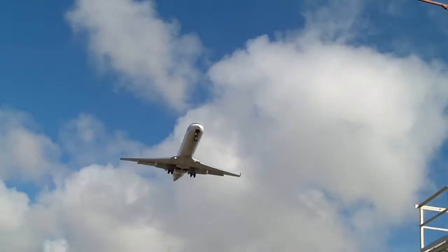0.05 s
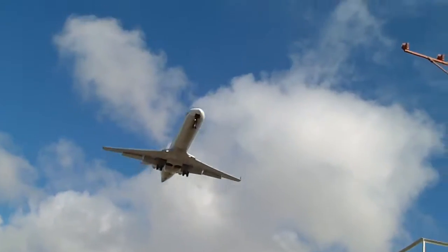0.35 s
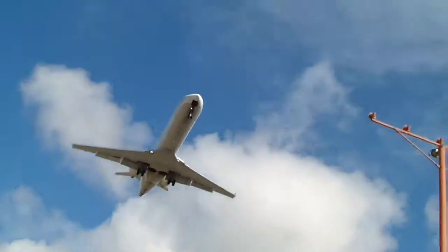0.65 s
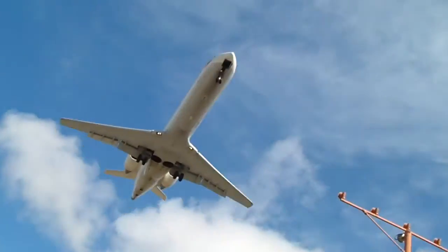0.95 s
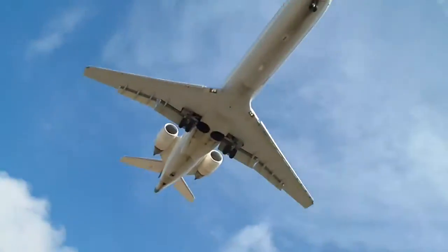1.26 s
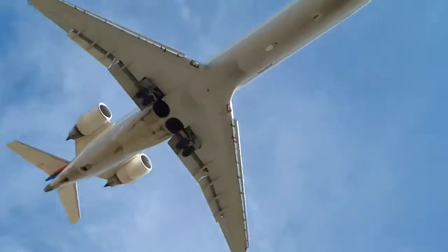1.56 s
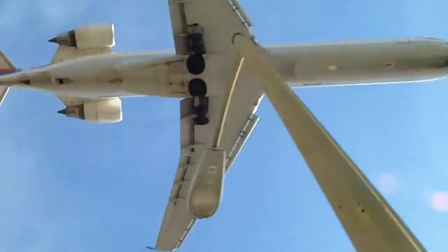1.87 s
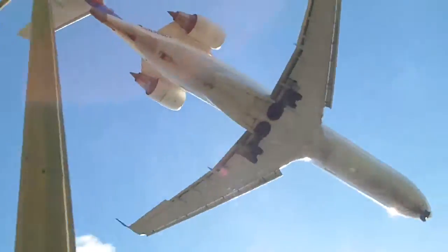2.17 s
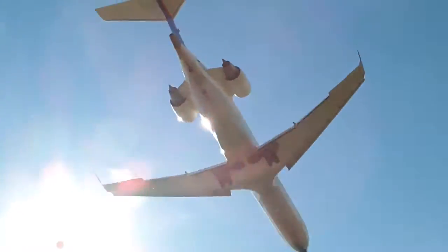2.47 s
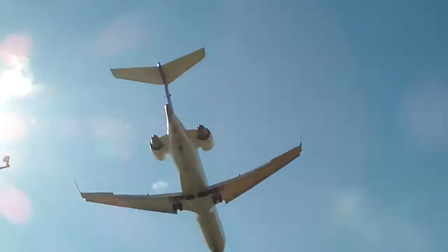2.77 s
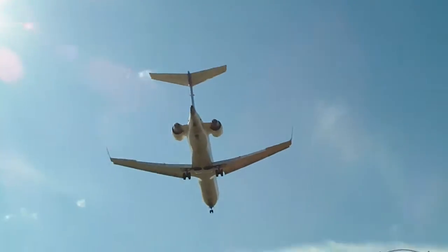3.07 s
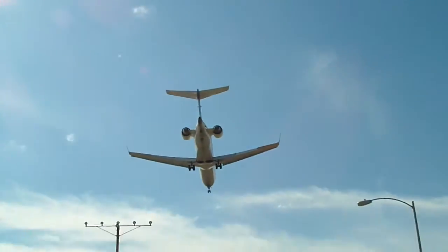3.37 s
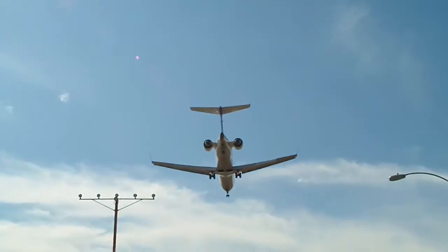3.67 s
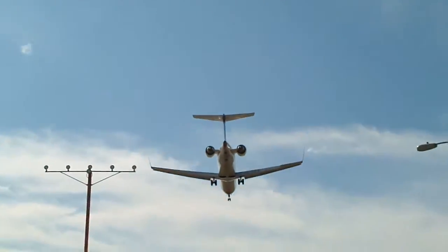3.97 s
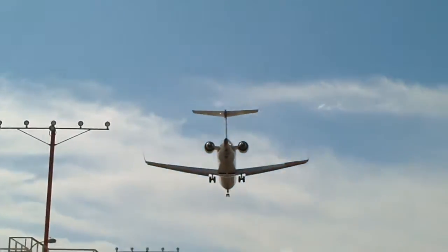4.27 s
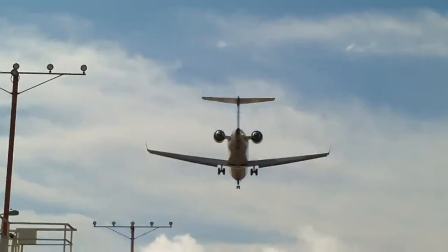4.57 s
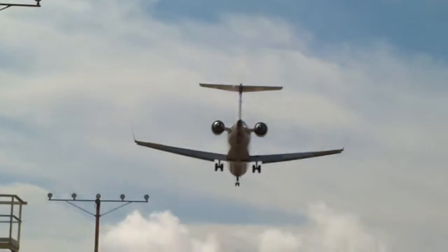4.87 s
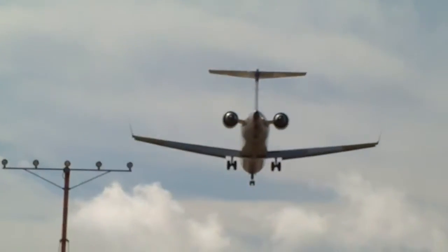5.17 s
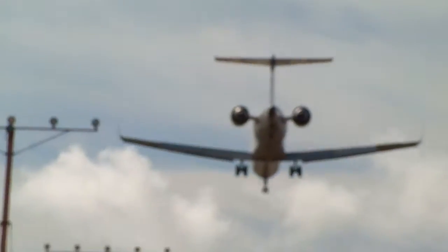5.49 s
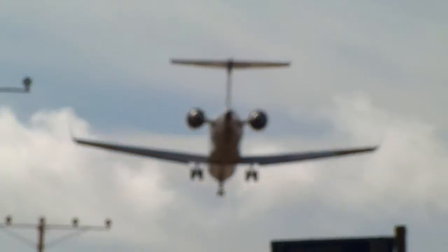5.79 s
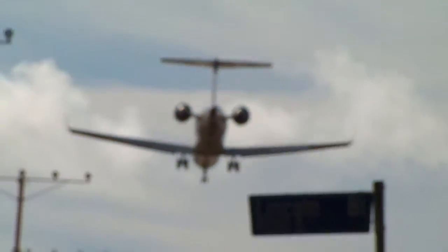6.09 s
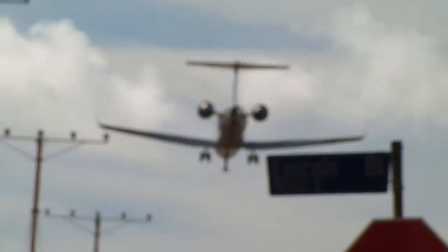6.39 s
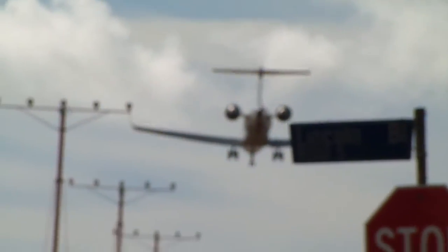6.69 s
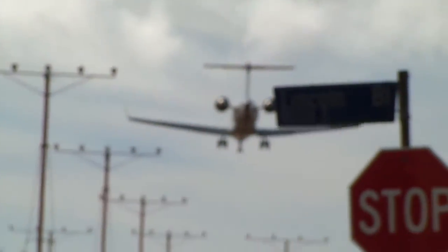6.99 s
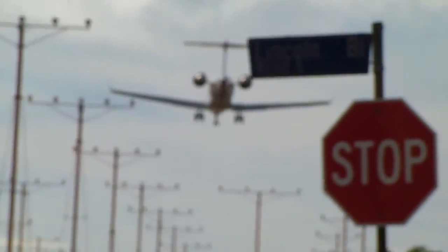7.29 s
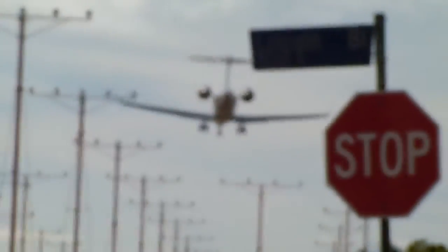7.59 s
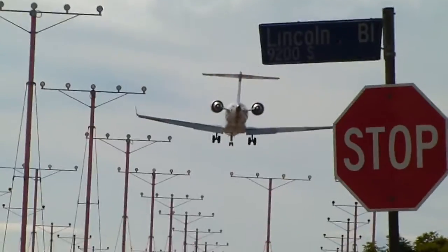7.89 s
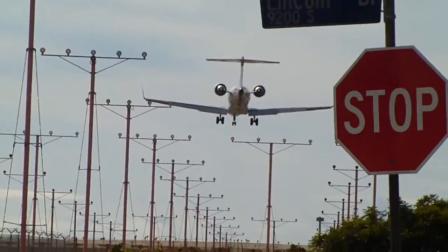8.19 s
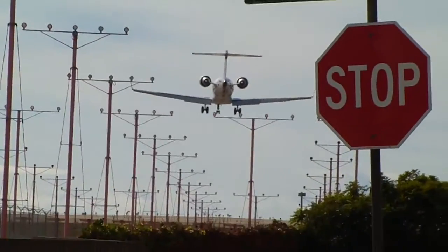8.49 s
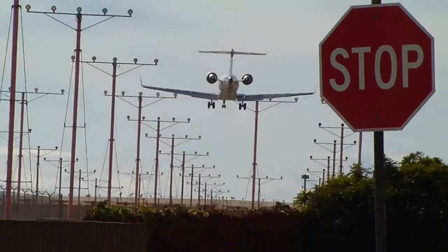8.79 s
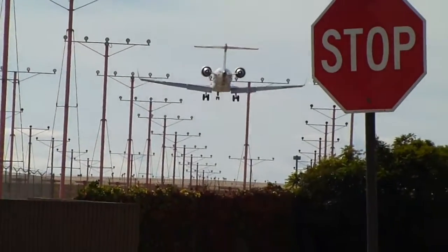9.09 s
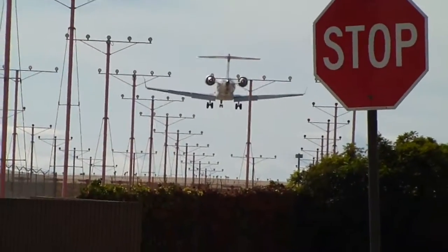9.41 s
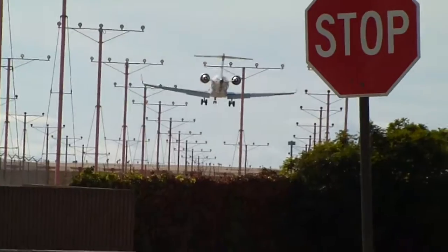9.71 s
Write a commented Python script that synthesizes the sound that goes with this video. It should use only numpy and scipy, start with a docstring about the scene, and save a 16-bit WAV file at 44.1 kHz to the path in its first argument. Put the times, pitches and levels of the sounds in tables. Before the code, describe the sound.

A small twin-engined jet is already approaching at the start, a high, wavering fan whine over a broad rushing roar with a faint hum beneath. From about 1 to 1.7 seconds its hiss surges and the whine begins to slide down. It passes low overhead at around 2 seconds, the roar taking on a hollow, phasing sweep. A thin, very high whistle stands out near 2.5 seconds, falling in pitch and fading by about 6. From 3 seconds on the jet recedes: the hiss drains away, the whine sinks lower and weakens, and a duller, fluttering roar lingers. The roar rolls back slightly between 7 and 8 seconds, with a deep rumble just after 8. A few tiny, faint ticks occur near the microphone from about 7.8 seconds. At 9.5 the distant roar swells once more. The sound is outdoors, in stereo, from under the approach path.

```python
"""Small twin jet landing, from under the approach path

The jet passes about 45 m above the microphone at 2 s and sinks away toward the runway. Exhaust,
airframe and fans make a broad roar, coloured by distance and direction; fan and turbine tones fall
in pitch. The ground echo sweeps a comb through the roar and uneven air makes it flutter.
A camcorder's stereo microphone colours it all."""
import sys
import numpy as np
from scipy import signal
from scipy.fft import rfft, irfft, next_fast_len
from scipy.io import wavfile
from scipy.ndimage import uniform_filter1d, map_coordinates

SR = 44100
rng = np.random.default_rng(int(sys.argv[2]) if len(sys.argv) > 2 else 0)


def waveform_to_disk(signal):
    """Save audio, clipped to [-1, 1], as 16-bit WAV at the path in sys.argv[1]."""
    frames = np.transpose(np.atleast_2d(signal))
    scaled = np.clip(frames, -1, 1) * 32767
    samples = np.round(scaled).astype(np.int16)
    wavfile.write(sys.argv[1], SR, samples)


N = 434365
TIME = np.arange(N) / SR
OVERHEAD_S = 1.98  # the jet is heard from straight above

# spectra of the jet's middle, high and highest flow noise: f/Hz, level/dB
ROAR_SPECTRUM = [(330, -69), (470, -7), (570, -1.5), (780, 1), (1000, 2.5), (1200, 1), (1500, -4),
                 (2200, -41)]
HISS_SPECTRUM = [(1800, -8), (2400, 1.5), (2850, 0.5), (3300, 3.5), (4000, 6), (4800, 3.5), (5400, -8),
                 (6300, -37.5), (9000, -65)]
SIZZLE_SPECTRUM = [(5000, -27), (6800, -3), (8100, 0.5), (9400, -7.5), (10600, -14.5), (11500, -32.5),
                   (13500, -48)]


def flight(height_m=44.5, speed_m_s=68, sound_m_s=343):
    """Where the sound now heard left the jet: distance in heights, degrees off nose, Doppler factor."""
    mach, descent_s = speed_m_s / sound_m_s, height_m / sound_m_s
    heard_s = TIME - OVERHEAD_S + descent_s
    root_s = np.sqrt((mach * heard_s) ** 2 + (1 - mach ** 2) * descent_s ** 2)
    sent_s = (heard_s - root_s) / (1 - mach ** 2)  # on a straight, level path
    angle = np.arctan2(height_m, -speed_m_s * sent_s)
    return 1 / np.sin(angle), np.degrees(angle), 1 / (1 - mach * np.cos(angle))


def passing(path, lobes, db, doubling_db, fading=1):
    """Level in dB at the microphone: a step per doubling of distance, lobes, a share of slow fading."""
    # slow swells and fades: t/s, gain/dB
    fades = [(0, 1), (.1, -1), (.28, 1), (.95, -1.5), (1.15, 0.6), (1.5, 1.5), (1.82, -0.5), (2.25, 0.6),
             (3.1, 2.5), (3.85, 2), (4.3, 3.5), (5.25, 1.1), (5.6, -0.5), (6.8, -1), (7.35, -0.4),
             (8.2, -0.3), (9.2, -4), (9.85, 0)]
    distance, angle, _ = path
    return db + doubling_db * np.log2(distance) + bumps(angle, lobes) + fading * curves(fades)[0]


def flow_levels(path):
    """Levels in dB of the six flow noises; with distance the treble sinks and the bass takes over."""
    # lobes of each noise, 0 deg ahead of the nose, 180 behind: angle/deg, half width/deg, gain/dB
    boom_lobes = [(26, 7, 4), (49.6, 10, 2), (105, 30, -5), (156.5, 17.5, -5.5), (164, 2.2, -2.5),
                  (171.2, 0.98, 3.5)]
    rumble_lobes = [(25.5, 12, 7.5), (97.6, 34, 11), (157.3, 11.5, -6), (167.4, 1.7, 2.5), (173, 1.3, -0.5),
                    (173.8, 1.1, 1.5)]
    roar_lobes = [(24.5, 6.7, 4.5), (100.4, 37.4, 6.5), (154.2, 30, -8)]
    rush_lobes = [(25.5, 13.8, 6.5), (115, 14, 2), (155, 11, -3)]
    hiss_lobes = [(16.1, 3.1, 2.8), (29.5, 26, 7), (123, 20, 2.2)]
    sizzle_lobes = [(13.4, 2.7, 11), (38.6, 33.5, 10), (125.3, 32, 9.7)]
    # far off, the roar rolls back twice and the hiss gusts: t/s, half length/s, rise/dB
    rolls = [(7.3, 0.29, 2.5), (7.98, 0.38, 1.5)]
    gusts = [(7.33, .15, 3.5), (8.803, 0.034, 2)]
    return (passing(path, boom_lobes, db=-54, doubling_db=2, fading=.2),
            passing(path, rumble_lobes, db=-43, doubling_db=1.48, fading=.17),
            passing(path, roar_lobes, db=-29, doubling_db=2) + bumps(TIME, rolls),
            passing(path, rush_lobes, db=-22.5, doubling_db=-1.73) + .22 * bumps(TIME, rolls),
            passing(path, hiss_lobes, db=-22.5, doubling_db=-4.5) + bumps(TIME, gusts),
            passing(path, sizzle_lobes, db=-36.5, doubling_db=-8.5))


def flow_noise(levels):
    """Exhaust, airframe and fan noise; uneven air shakes the upper bands together, the treble most."""
    # spectra of the exhaust's deep boom, the rumble and the upper-middle rush: f/Hz, level/dB
    boom_spectrum = [(20, -47), (45, -32), (85, -10.5), (125, -5), (170, -1), (240, 1.5), (400, -31)]
    rumble_spectrum = [(100, -23.5), (170, -11), (240, -3), (350, 2), (470, 4.5), (600, 1.5), (950, -44)]
    rush_spectrum = [(700, -29), (1050, -10), (1350, 2), (1700, 4), (2100, 2.5), (2500, -1.5), (2900, -2),
                     (4000, -8.5), (6000, -94)]
    # surges of intake hiss just before the jet is overhead: t/s, half length/s, rise/dB
    surges = [(1.157, 0.022, 9), (1.263, 0.034, 6.5), (1.425, 0.021, 4), (1.505, 0.02, 2),
              (1.623, .02, 2.5)]
    boom_db, rumble_db, roar_db, rush_db, hiss_db, sizzle_db = levels
    flutter = walk(24)
    surge_db = bumps(TIME, surges)
    surge_db = surge_db - uniform_filter1d(surge_db, SR // 4)  # lulls lie between the surges
    boom = stream(boom_spectrum, boom_db + .85 * walk(5.2))
    rumble = stream(rumble_spectrum, rumble_db - .5 + .5 * walk(4.2))
    roar = stream(ROAR_SPECTRUM, roar_db - .5 + .1 * flutter + .25 * walk(12))
    rush = stream(rush_spectrum, rush_db - .8 + .31 * flutter + .1 * walk(12))
    hiss = stream(HISS_SPECTRUM, hiss_db + 1.68 + .35 * flutter + .17 * surge_db + .5 * walk(36))
    sizzle = stream(SIZZLE_SPECTRUM, sizzle_db - .6 + .5 * flutter + surge_db + walk(50))
    return boom + rumble + roar + rush + hiss + sizzle


def fans(path, detune=.006, wander=.00297, second_fan_db=-7, flutter_db=2.4):
    """Two fans, not quite in step: three harmonics of the blade tone, in skirts of scattered sound."""
    # blade-passing tone, falling with Doppler shift and throttle: t/s, f/Hz
    blade_pitch = [(0, 2657), (.48, 2665), (.72, 2598), (.9, 2520), (1.1, 2440), (1.35, 2372), (1.52, 2328),
                   (1.68, 2300), (2.15, 2172), (2.35, 2092), (2.65, 2002), (3.1, 1945), (3.5, 1830),
                   (4, 1738), (5, 1715), (6.5, 1520), (9.85, 1470)]
    # lobes of the blade tone and of its octave: angle/deg, half width/deg, gain/dB
    blade_lobes = [(22, 9, 7), (34, 3.5, -5), (50, 12, 8.5), (80, 11, -10.5), (108, 26, 6.3),
                   (158, 1.7, -6), (163, 4, -1.5), (168.4, 1.3, -7)]
    octave_lobes = [(19, 9, 4.5), (33, 4.5, 13), (41, 6, 11.5), (57, 14, 11), (125, 15, 4)]
    # brief flares of the blade tone: t/s, half length/s, rise/dB
    flares = [(0.02, .03, 7), (1.52, 0.04, 5), (1.66, .03, 6), (2.07, .06, 4.5), (2.615, 0.06, 8),
              (3.52, .07, 3), (4.093, 0.07, 6)]
    hz, = curves(blade_pitch)
    _, angle, _ = path
    # heard from behind, through the wake, the skirt takes over and the flutter grows
    wake = np.clip((angle - 90) / 90, 0, 1) ** 4
    clean_db, skirt_db = 1.4 - 7 * wake, -6 + 7 * wake
    blade_db = passing(path, blade_lobes, db=-32, doubling_db=-2.5) + bumps(TIME, flares)
    octave_db = passing(path, octave_lobes, db=-38, doubling_db=-3.5)
    whine = 0
    for harmonic, db in enumerate((blade_db, octave_db, octave_db - 17), 1):
        tone = undb(skirt_db) * scattered(harmonic * hz, width_hz=85 * harmonic)
        for offset, fan_db in ((0, 0), (detune, second_fan_db)):
            pitch = harmonic * hz * (1 + offset + wander * walk(90))
            gain = undb(clean_db + fan_db + flutter_db * walk(60))
            tone = tone + gain * np.sin(phase_of(pitch))
        whine = whine + undb(db + flutter_db * np.sqrt(wake) * walk(30)) * tone
    return whine


def turbines(stage_ratio=.845):
    """Two turbine stages: a whistle in a haze scattered by the hot exhaust, and a weaker one below."""
    # whistle sent out behind the jet: t/s, f/Hz, level/dB
    glide = [(1.4, 9800, -90), (1.7, 9480, -52), (1.9, 9250, -47), (2.05, 8900, -38), (2.3, 8280, -33.5),
             (2.55, 7880, -34), (3, 7660, -39), (3.6, 7400, -48), (4.3, 7270, -51.5), (5.2, 7200, -56),
             (6.2, 7120, -68), (9.85, 7050, -80)]
    hz, db = curves(glide)
    upper = undb(-3) * (scattered(hz, width_hz=65) + scattered(hz, width_hz=240))
    lower = undb(-4) * scattered(stage_ratio * hz, width_hz=150)
    return undb(db) * (upper + lower)


def compressors():
    """Two faint intake whistles on one pitch, heard only while the jet comes toward the microphone."""
    # whistle sent out ahead of the jet: t/s, f/Hz, level/dB
    glide = [(.6, 10500, -80), (1.1, 10080, -54), (1.3, 9950, -51), (1.65, 9750, -56), (1.9, 9500, -100)]
    hz, db = curves(glide)
    return undb(db) * (scattered(hz, width_hz=80) + scattered(hz, width_hz=80))


def shafts(path, shaft_hz=373, drift_hz_per_s=3.8, wander=.00293):
    """Engine shaft hum: a wavering tone that drops as the jet goes over and blurs as it recedes."""
    # strength of the hum: t/s, level/dB
    hum_level = [(0, -43), (1.1, -40), (1.6, -50), (2.2, -46), (3, -51), (3.7, -62), (4.9, -57), (5.7, -47),
                 (6.7, -47), (7.5, -54), (9.85, -62)]
    _, angle, doppler = path
    hz = doppler * (shaft_hz + drift_hz_per_s * (TIME - OVERHEAD_S))
    db, = curves(hum_level)
    blur = .9 * (angle / 180) ** 2
    tone = np.sqrt(2) * np.sin(phase_of(hz * (1 + wander * walk(13))))
    return undb(db) * (np.sqrt(1 - blur) * tone + np.sqrt(blur) * scattered(hz, width_hz=15))


def howl():
    """A hollow howl: a narrow band wandering within the roar."""
    # course of the band: t/s, f/Hz, level/dB
    glide = [(0, 1060, -27.5), (1.1, 1068, -28.5), (1.6, 951, -32), (2.2, 810, -34), (3.3, 986, -33),
             (4.1, 906, -39), (4.85, 958, -33.5), (5.7, 965, -60)]
    hz, db = curves(glide)
    return undb(db) * scattered(hz, width_hz=150)


def far_swell():
    """Far down the approach the roar swells once more, with no bass and no treble."""
    # rise of the swell: t/s, level/dB
    rise = [(0, -90), (9.3, -51), (9.5, -30.5), (9.65, -26.5), (9.85, -25.5)]
    # its spectrum: f/Hz, level/dB
    spectrum = [(900, -30), (1150, -6), (1500, -4.5), (1900, -4.5), (2300, -8.5), (2800, -24), (6000, -68)]
    db, = curves(rise)
    return stream(spectrum, db)


def ground_echo(jet, path, overhead_lag_ms=12.3, far_lag_ms=2.07, sink_per_s=.1, dull_hz=2000):
    """Add a duller copy off the ground; its lag shrinks toward the horizon and sweeps a comb."""
    # directions of strong echo: angle/deg, half width/deg, gain/dB
    lobes = [(21, 7, 11.5), (135, 14, 2.5), (163, 7, 10.5)]
    distance, _, _ = path
    height_share = np.exp(-sink_per_s * np.maximum(TIME - OVERHEAD_S, 0))
    lag_ms = np.maximum(overhead_lag_ms * height_share / distance, far_lag_ms)
    echo_db = passing(path, lobes, db=-14, doubling_db=-4, fading=0)
    echo = np.interp(TIME - lag_ms / 1000, TIME, jet, left=0)
    return jet + undb(echo_db) * signal.sosfilt(signal.butter(1, dull_hz, fs=SR, output="sos"), echo)


def surroundings(levels, steady_hiss_db=-66.5):
    """Sound thrown back from all around, widest in the bass, over a faint steady hiss."""
    # deep rumble, strongest once the jet is far off: t/s, level/dB
    deep_level = [(0, -56), (.7, -50), (1.5, -60), (2.3, -62), (3.25, -73), (3.75, -56.5), (4.3, -61),
                  (5.3, -58.5), (6.7, -57.5), (7.5, -60), (8.15, -45), (8.7, -57), (9.4, -51), (9.85, -57)]
    # its spectrum: f/Hz, level/dB
    deep_spectrum = [(20, -16), (45, -5.5), (80, -2), (130, -5.5), (250, -2.5), (700, -23)]
    _, _, roar_db, _, hiss_db, sizzle_db = levels
    deep_db, = curves(deep_level)
    mid = stream(deep_spectrum, deep_db - 1) + stream(SIZZLE_SPECTRUM, steady_hiss_db)
    side = (stream(deep_spectrum, deep_db - 4) + stream(ROAR_SPECTRUM, roar_db - 33)
            + stream(HISS_SPECTRUM, hiss_db - 27) + stream(SIZZLE_SPECTRUM, sizzle_db - 4.5))
    return mid + side * np.array([[1], [-1]])


def drone():
    """A faint low drone that surfaces as the jet recedes."""
    # course of the drone: t/s, f/Hz, level/dB
    glide = [(3, 101, -75), (5, 102.4, -67), (6.6, 103, -59), (7.3, 83.6, -69), (8.1, 81.5, -64),
             (9.85, 85.3, -65.5)]
    hz, db = curves(glide)
    return undb(db) * scattered(hz, width_hz=3)


def ticks():
    """Tiny soft ticks close to the microphone: treble bursts that rise in a few ms and die at once."""
    # the bursts: t/s, level/dB, decay/s
    bursts = [(7.765, -49, 0.018), (8.065, -58, 0.013), (8.634, -44, .006), (8.688, -50, 0.0063),
              (8.808, -54, 0.009), (8.98, -49, .005), (9.03, -51, 0.012), (9.68, -52, .012)]
    spectrum = [(3000, -6), (4800, -4), (8500, 9), (10000, 0), (11500, -28)]  # f/Hz, level/dB
    envelope = sum(undb(db) * (TIME >= s) * np.exp(-np.abs(TIME - s) / decay) for s, db, decay in bursts)
    return uniform_filter1d(envelope, size=SR // 160) * stream(spectrum, db=-3)


def stream(spectrum, db):
    """Turbulent flow noise at a steady or moving level; it dies away beyond its spectrum's ends."""
    low, high = spectrum[0][0], spectrum[-1][0]

    def gain_at(hz):
        roll_off = np.minimum(hz / low, 1) ** 2 * np.minimum(high / hz, 1) ** 2
        return undb(over_pitch(spectrum, hz)) * roll_off
    return undb(db) * noise(gain_at)


def scattered(hz, width_hz):
    """A gliding tone smeared into a narrow band by turbulence; rms 1."""
    phase = phase_of(hz)
    in_phase, quadrature = (noise(lambda f: 1 / (1 + .5 * (f / width_hz) ** 2) ** 2) for _ in range(2))
    return in_phase * np.cos(phase) + quadrature * np.sin(phase)


def noise(gain_at):
    """Noise of rms 1 whose spectrum follows a function of frequency."""
    size = next_fast_len(N, True)
    hz = np.maximum(np.fft.rfftfreq(size, 1 / SR), 1)
    x = irfft(rfft(rng.standard_normal(size)) * gain_at(hz), size)[:N]
    return x / x.std()


def walk(rate):
    """Random wavering of spread 1, with rate new values a second."""
    x = map_coordinates(rng.standard_normal(8192), [TIME * rate], order=1, mode="wrap")
    return x / x.std()


def phase_of(hz):
    """Running phase of a gliding pitch, in radians."""
    return 2 * np.pi * np.cumsum(hz) / SR


def bumps(x, rows):
    """Sum of bell curves in dB, from rows of (centre, half width, dB)."""
    return sum(db * np.exp(-((x - centre) / width) ** 2) for centre, width, db in rows)


def curves(table):
    """Each column of a timed table, sample by sample."""
    times, *columns = np.transpose(table)
    return [np.interp(TIME, times, column) for column in columns]


def over_pitch(points, hz):
    """Join (Hz, value) points on a log-frequency axis."""
    point_hz, values = np.transpose(points)
    return np.interp(np.log(hz), np.log(point_hz), values)


def undb(db):
    """Decibels to gain."""
    return 10 ** (np.asarray(db) / 20)


def scene():
    """Under the approach path: the jet, its ground echo, the surroundings, a drone and close ticks."""
    path = flight()
    levels = flow_levels(path)
    roar = flow_noise(levels) + howl() + far_swell()
    jet = roar + fans(path) + turbines() + compressors() + shafts(path)
    return ground_echo(jet, path) + surroundings(levels) + drone() + ticks()


def record(dry):
    """Camcorder microphone: two ports that differ in level and phase, four notches and a cut top."""
    # balance of the ports: f/Hz, left minus right/dB
    port_balance = [(100, 2.2), (330, 2.6), (560, 3.7), (1100, 3.9), (2300, 3.6), (3300, 1), (4600, 0),
                    (5400, 3), (6300, 12), (7600, 16), (9000, 11.5), (10600, 7), (11700, -2)]
    # phase between them: f/Hz, left lead/rad
    port_phase = [(2000, 0), (3400, .1), (4400, .8), (5500, 1.3), (7000, .7), (9400, -.9)]
    # the camcorder's notches: f/Hz, width/Hz
    notches = [(3000, 503), (3500, 364), (5880, 560), (6560, 740)]
    top_hz = 12100
    bin_hz = np.maximum(np.fft.rfftfreq(N, 1 / SR), 1)
    left_to_right = undb(over_pitch(port_balance, bin_hz)) * np.exp(1j * over_pitch(port_phase, bin_hz))
    ports = 2 * np.array([left_to_right, np.ones_like(left_to_right)]) / np.abs(1 + left_to_right)
    stereo = irfft(rfft(dry) * ports, N)
    for hz, width_hz in notches:
        stereo = signal.lfilter(*signal.iirnotch(hz, hz / width_hz, fs=SR), stereo)
    return signal.sosfilt(signal.ellip(8, .2, 70, top_hz, fs=SR, output="sos"), stereo)


dry = scene()
out = record(dry)
waveform_to_disk(out)
```